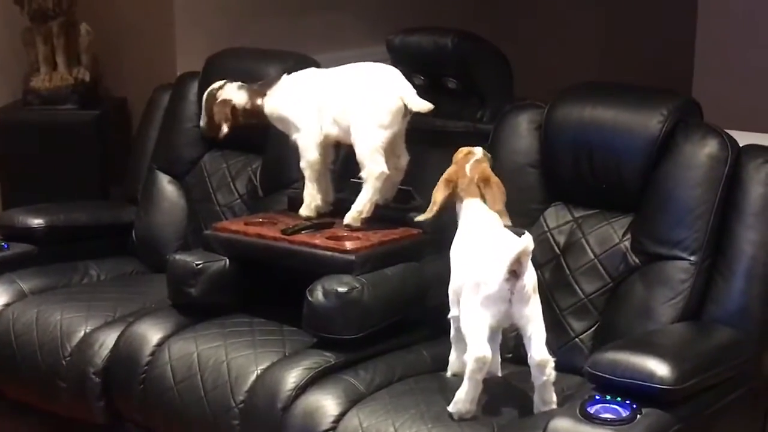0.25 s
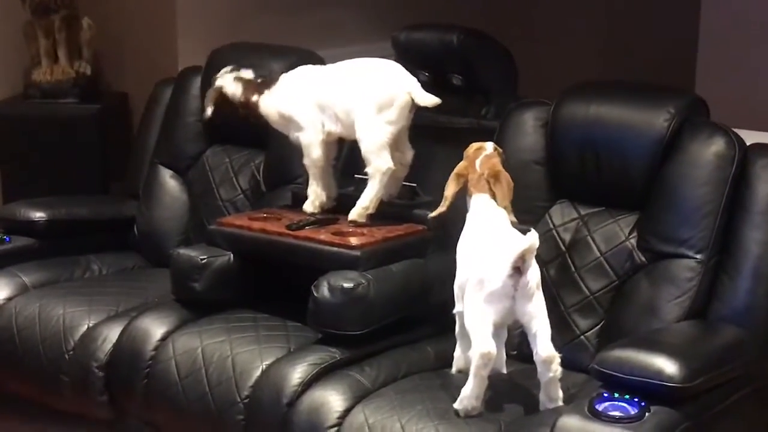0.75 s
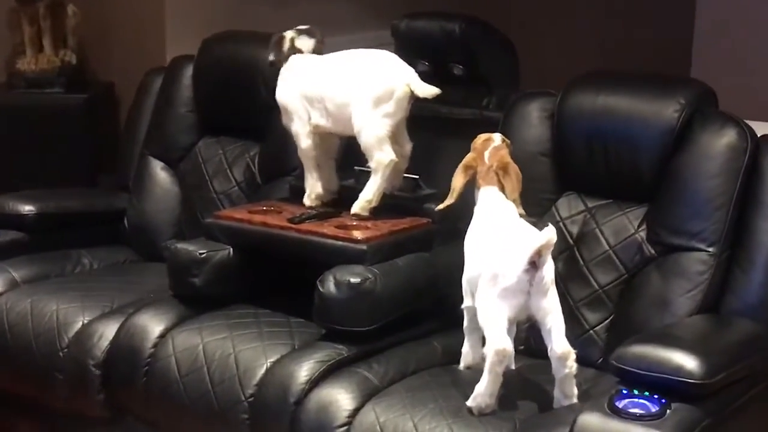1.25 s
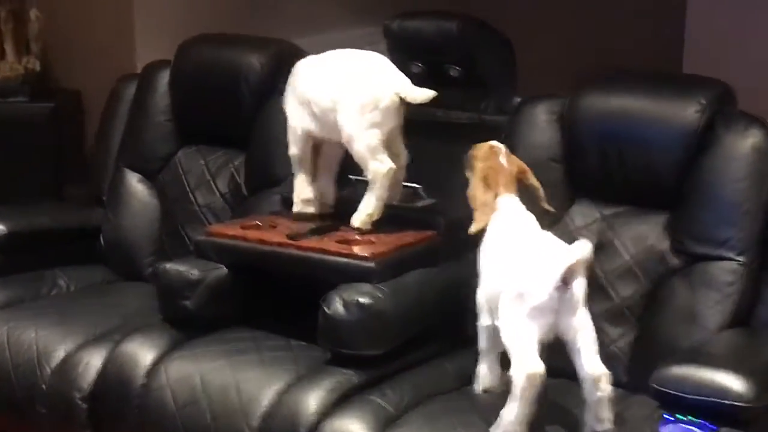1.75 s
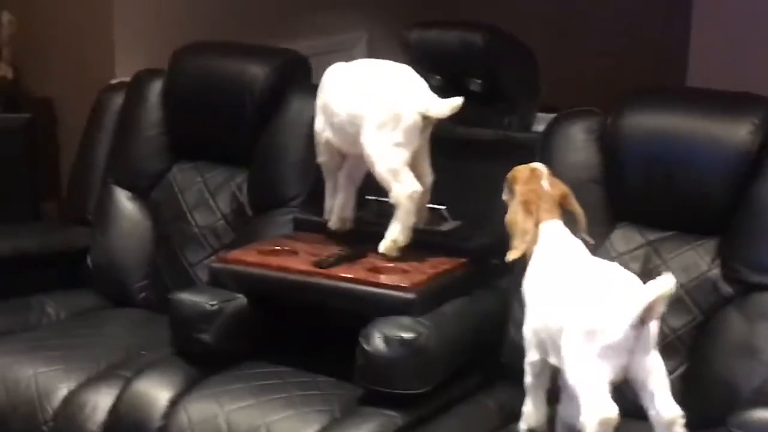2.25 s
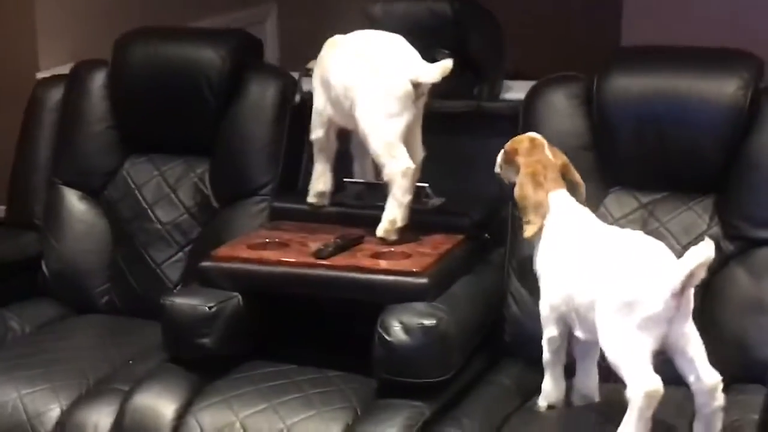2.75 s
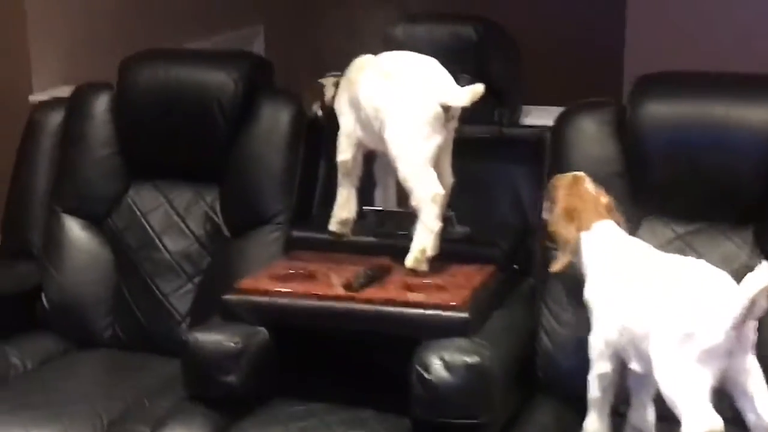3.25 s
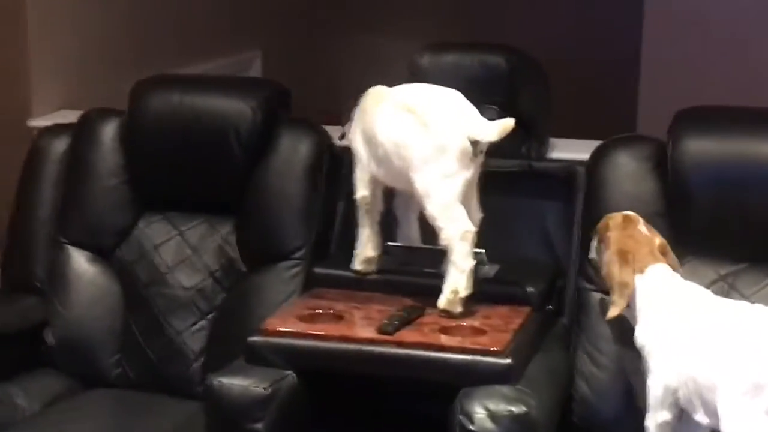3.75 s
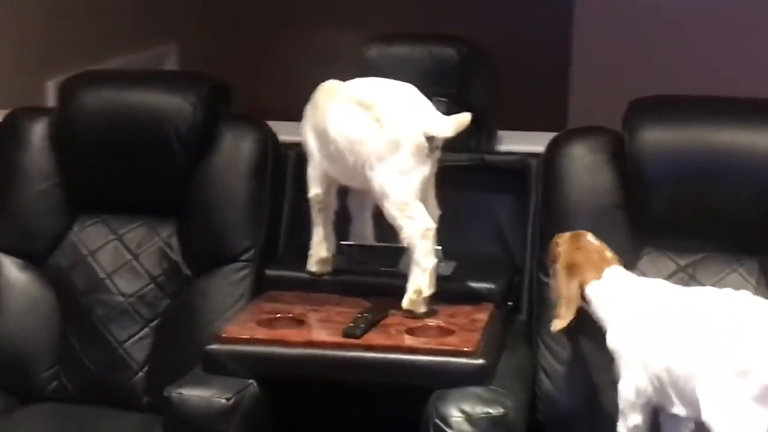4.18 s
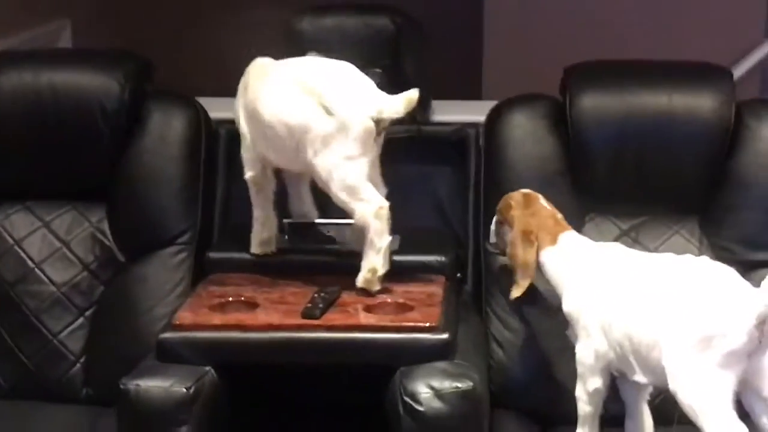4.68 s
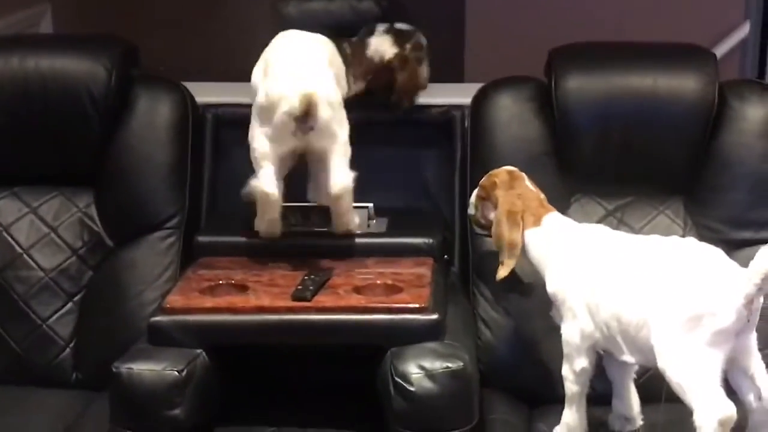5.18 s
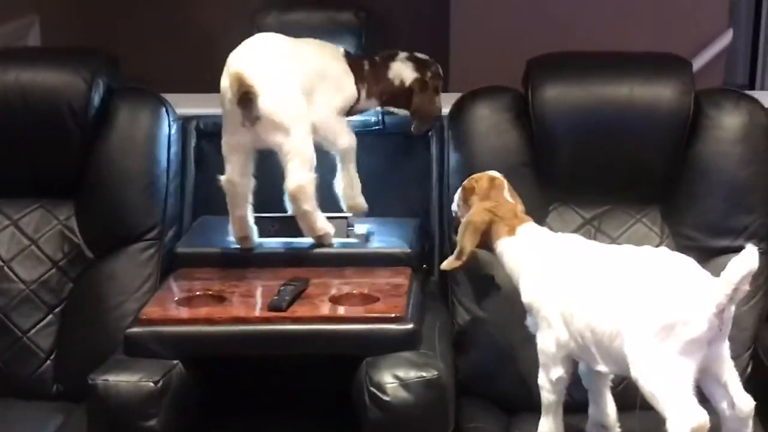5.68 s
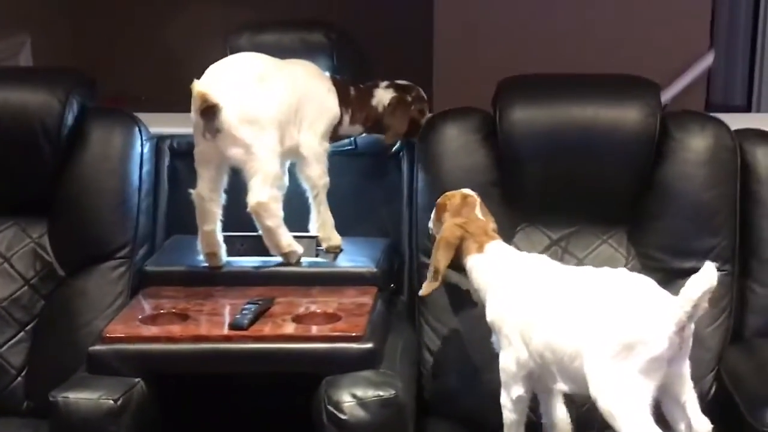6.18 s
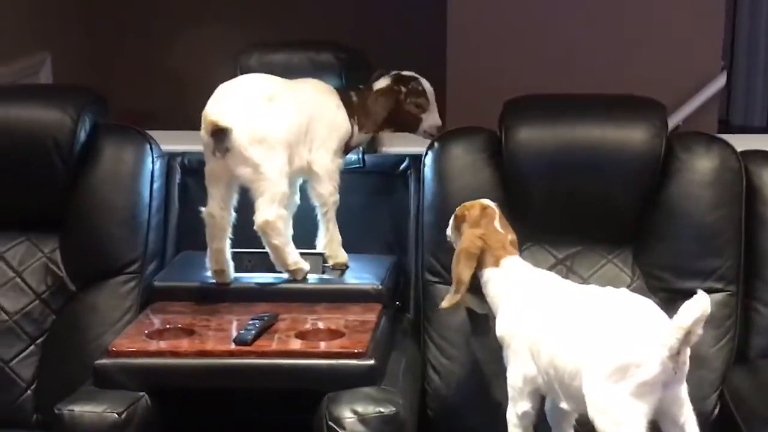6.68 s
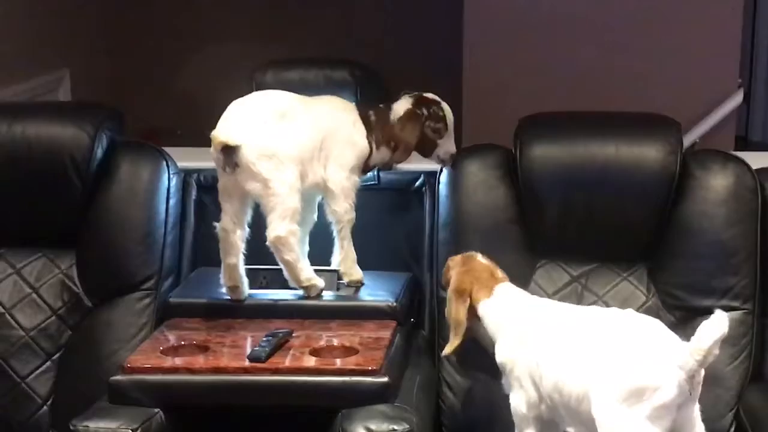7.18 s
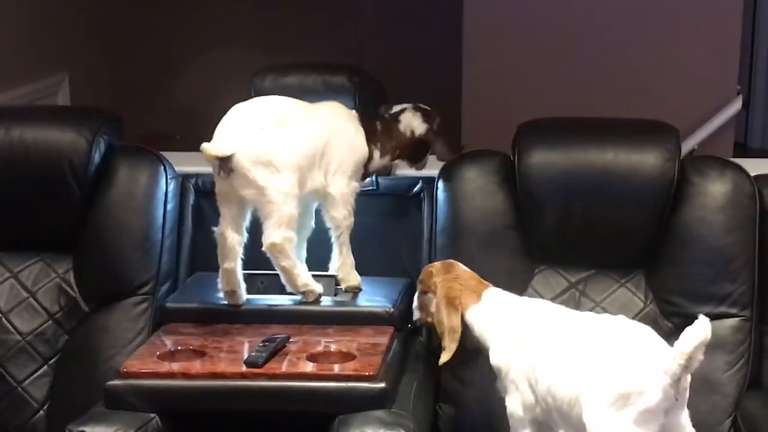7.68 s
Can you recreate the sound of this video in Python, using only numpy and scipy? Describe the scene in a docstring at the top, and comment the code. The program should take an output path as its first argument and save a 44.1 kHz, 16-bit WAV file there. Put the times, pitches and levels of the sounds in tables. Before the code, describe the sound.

Irregular soft thuds of a young goat's hooves come through leather seating, mixed with weight shifts, woody clicks and faint scuffing. The steps grow busier and heavier around the middle, then a single long trembling bleat starts abruptly, bright and reverberant, and drops off quickly. Afterwards the movement thins to light knocks and a short stuttering hoof drag. Quiet air and leather rustle lie beneath, heard through a modest mono microphone.

```python
"""A young goat, facing away, gives one long quavering bleat in a furnished room: harmonics through a throat
spectrum, heard more by the room's reflections than directly. Hooves and shifting weight send dry thuds
and a lumpy rumble through leather seats, made of falling sweeps, slow swings and filtered noise.
Hard edges tick as sets of ringing modes, a seam creaks and hooves scuff; air and leather hiss behind.
The microphone colours it all, with peaks in the treble."""
import sys
import numpy as np
from scipy import signal
from scipy.fft import rfft, irfft
from scipy.io import wavfile
from scipy.ndimage import uniform_filter1d

SR = 44100
rng = np.random.default_rng(int(sys.argv[2]) if len(sys.argv) > 2 else 0)


def dump_mix(stems):
    """Bounce the given channels to the path in sys.argv[1] as a 16-bit WAV at rate SR."""
    frames = np.atleast_2d(stems).T  # one column per channel
    limited = np.clip(frames, -1, 1)  # hard clip at full scale
    pcm = np.round(limited * 32767).astype(np.int16)
    wavfile.write(sys.argv[1], SR, pcm)


def magnitude_from_level(level_db):
    """Linear magnitude for a level in decibels (20 dB per decade)."""
    exponent = np.asarray(level_db, float) / 20
    return 10 ** exponent


N = 349713  # samples


def evened(x):
    """Scales to rms 1."""
    return x / np.sqrt(np.mean(x ** 2) + 1e-20)


def read(points, hz):
    """Reads a spectrum table on a log frequency axis."""
    f, value = np.transpose(points)
    return np.interp(np.log(hz + 1), np.log(f + 1), value)


def curve(rows):
    """Joins (time, value) rows by straight lines, at every sample."""
    s, value = np.transpose(rows)
    return np.interp(np.arange(N) / SR, s, value)


def add(mix, s, sound):
    """Mixes a sound in at time s."""
    part = mix[max(round(s * SR), 0):][:len(sound)]
    part += sound[:len(part)]


def coloured(x, colour):
    """Filters x by a spectrum table."""
    hz = np.fft.rfftfreq(len(x), 1 / SR)
    return irfft(rfft(x) * magnitude_from_level(read(colour, hz)), len(x))


# how long the furnished room rings: pitch_hz, t60_s
ROOM_DECAY = [(400, 0.21), (1500, 0.58), (4000, 0.34), (9000, 0.55)]


def room(x):
    """Sparse reflections of random sign, each band dying at its own speed."""
    taps = np.zeros(SR)
    at = np.arange(200, SR - 20, 20)
    taps[at + rng.integers(0, 20, len(at))] = rng.choice([-1., 1.], len(at))
    hz, t, z = signal.stft(taps, SR, nperseg=256)
    decay = magnitude_from_level(-60 * t / read(ROOM_DECAY, hz)[:, None])
    tail = signal.istft(z * decay, SR, nperseg=256)[1]
    return signal.fftconvolve(x, tail / np.linalg.norm(tail))[:N]


# the call as it goes: time_s, effort_db, pitch_hz (between quavers),
# treble_lift_db (as the mouth opens), mouth_hz (lowest mouth resonance)
BLEAT_COURSE = [(4.888, -39.5, 440.5, -1.5, 846), (4.94, -37, 447.7, 2.5, 1190),
                (5.048, -36.5, 440.5, 9.5, 1060), (5.3, -41.5, 440.1, 8, 1310),
                (5.449, -40.5, 435.2, 2.5, 1100), (5.602, -44, 430.5, 1, 940),
                (5.762, -42.5, 424.6, -7, 900), (5.871, -45, 419.4, -2, 930), (5.919, -43, 442, 0.5, 1110),
                (6.02, -46, 433.6, 5, 1090), (6.059, -42, 440.3, -1, 1017)]
# how the throat passes the voice: pitch_hz, level_db
THROAT_SPECTRUM = [(300, -13), (450, -12.5), (640, -56), (880, -6.5), (1350, -10.5), (1800, -9.5),
                   (2400, -7.5), (3100, -17), (4000, -14), (6000, -20), (8000, -41), (10500, -63)]


def bleat():
    """Harmonics of the vocal folds, flipping up in pitch at every quaver and shaped by throat and mouth."""
    attack_s, attack_db = 0.021, -22  # the voice snaps on
    release_db_per_s, release_hz_per_s = 316, 1100  # at the end it fades and slides down
    s, *columns = np.transpose(BLEAT_COURSE)
    t = np.arange(s[0] - attack_s, s[-1] + 0.063, 1 / SR)
    effort_db, hz, lift_db, mouth_hz = (np.interp(t, s, c) for c in columns)
    early = np.maximum(s[0] - t, 0) / attack_s
    late = np.maximum(t - s[-1], 0)
    effort_db = effort_db + attack_db * early - release_db_per_s * late
    hz = hz * (1 - 0.025 * early) - release_hz_per_s * late

    # the larynx flips to a higher register and back at a steady pace
    first_quaver_s, quaver_gap_s, half_length_s = 4.945, 0.0838, 0.021
    quaver_hz, quaver_db = 32.83, -5.5
    middle_s = first_quaver_s + quaver_gap_s * np.arange(14)[:, None]
    jumps = np.exp(-((t - middle_s) / half_length_s) ** 6).sum(axis=0)

    wobble, air = rng.standard_normal((2, len(t)))
    # the folds lose their hold as the breath runs out
    loose = 0.006 + 0.037 * np.clip((t - 6.04) / 0.033, 0, 1)
    hz = (hz + quaver_hz * jumps) * (1 + loose * evened(uniform_filter1d(wobble, size=600)))
    turns = np.cumsum(hz) / SR
    # unsteady folds, partly shared by all partials
    flutter = uniform_filter1d(rng.standard_normal((24, len(t))), size=800, axis=1)
    flutter_db = 3.6 * evened(flutter + flutter[0])

    bright_hz = 2972 + 300 * (t - s[0])  # a bright resonance climbs through the call
    tone = np.zeros(len(t))
    for k in range(1, 24):
        f = k * hz
        opening_db = lift_db * np.clip(np.log2(f / 1500), 0, 1)  # an open mouth raises the treble
        bright_db = 17 / (1 + ((f - bright_hz) / 200) ** 2)
        mouth_db = 14 / (1 + ((f - mouth_hz) / 387) ** 2)
        partial_db = read(THROAT_SPECTRUM, f) + opening_db + bright_db + mouth_db + flutter_db[k]
        tone += magnitude_from_level(partial_db) * np.cos(2 * np.pi * k * turns)

    # breath noise, strongest at the start of every cycle
    puffs = evened(coloured(np.exp(-(turns % 1) / 0.59) * air, THROAT_SPECTRUM)) * magnitude_from_level(0.17 * lift_db)
    voice = np.zeros(N)
    add(voice, t[0], (tone + 0.03 * puffs) * magnitude_from_level(effort_db + quaver_db * jumps))
    # a closed-mouth hum leads into the call
    hum_s = 0.045
    lead = np.arange(0, 2 * hum_s, 1 / SR)
    add(voice, t[0] - hum_s, magnitude_from_level(-51) * np.hanning(len(lead)) * np.sin(2 * np.pi * hz[0] * lead))
    return magnitude_from_level(-6) * voice + magnitude_from_level(-2.5) * room(voice)  # facing away: more room than direct voice


def thud(hz, low_db, grit):
    """Bending waves spread out: the high part arrives first and sweeps down, then a slow low swing."""
    t = np.arange(len(grit)) / SR
    f = np.fft.rfftfreq(len(grit), 1 / SR) / hz
    sweep = 2 * np.pi * np.cumsum(hz * (0.645 + 1.79 * np.exp(-t / 0.0045))) / SR
    # uneven contact
    rattle = evened(irfft(rfft(grit) * f / (1 + (f / 2.5) ** 5), len(grit)))
    rattle = 0.55 * magnitude_from_level(-60 * t / 0.04) * rattle
    blow = (np.sin(sweep) + rattle) * (1 - np.exp(-(t / 0.0034) ** 2))
    blow = blow * magnitude_from_level(11 - 60 * t * hz ** 0.5 / 0.91)  # higher thuds die sooner
    swing = np.sin(2 * np.pi * 62 * t) * (1 - np.exp(-t / 0.024))
    swing = swing * magnitude_from_level(low_db + 19 - 60 * t / 0.086)
    return blow - swing


# hoof blows on the seats: start_s, level_db, pitch_hz (scales the falling sweep),
# low_db (weight of the slow swing in the thud)
HOOF_THUDS = [(0.435, -38, 220, -17), (0.45, -40, 243, 11.5), (0.611, -46, 208, -13), (0.66, -32, 259, -36),
              (0.98, -26, 214, -1.5), (1.169, -26.5, 168, -2.5), (1.31, -37, 190, -19),
              (1.529, -38.5, 183, 1.5), (1.638, -43, 324, -20), (1.822, -29.5, 190, -6),
              (1.843, -35, 154, 4), (1.967, -28, 317, 3), (2.391, -37, 238, -11), (2.636, -35, 230, -1.5),
              (2.749, -34.5, 276, -3), (2.981, -37, 194, 2), (3.016, -29.5, 163, 2.5),
              (3.047, -31.5, 183, -7), (3.07, -28.5, 339, 3.5), (3.245, -33, 531, -32),
              (3.387, -14.5, 306.5, -21), (3.401, -23.5, 220.5, -5.5), (3.423, -28.5, 219, -1),
              (3.767, -25, 189, -3), (3.827, -26, 192, -26), (3.873, -27, 223, -5.5),
              (3.939, -42, 206, -17), (3.961, -33.5, 160, -24), (4.031, -20, 206, -3),
              (4.064, -27, 227, -8), (4.095, -33, 207, 1), (4.475, -26.5, 216, -4.5),
              (4.627, -26, 221, -5.5), (4.668, -26.5, 195, -3.5), (4.772, -43.5, 290, -13),
              (4.796, -30.5, 218, -6), (5.119, -40.5, 157, -3), (5.468, -25.5, 203, -1.5),
              (5.791, -39.5, 290, -2), (5.812, -31, 166, -10), (6.224, -40.5, 249.1, 2),
              (6.252, -35, 174, 0), (6.289, -38.5, 175, 4.5), (6.599, -33.5, 370, 4),
              (6.632, -33.5, 252, -13), (6.82, -31.5, 263, -18), (6.775, -47, 236, -0.5),
              (6.889, -44, 170, -1), (7.106, -55.5, 161, -3), (7.174, -49.5, 167, -6),
              (7.281, -52, 155, 3.5), (7.462, -51, 248, 7), (7.501, -31.5, 255, 1.5)]


def thuds():
    """Hoof blows carried through the furniture, each a bending-wave thud with its own grit."""
    out = np.zeros(N)
    for s, db, hz, low_db in HOOF_THUDS:
        add(out, s - 0.0015, magnitude_from_level(db) * thud(hz, low_db, rng.standard_normal(6000)))
    return out


# one hoof dragged over leather: start_s, end_s, jerks_per_s, pitch_hz, level_db
HOOF_JUDDER = (7.522, 7.65, 64, 205, -47)


def judder():
    """Stick-slip: the hoof grips and lets go in a quick row of slightly uneven small thuds."""
    out = np.zeros(N)
    start, end, rate, hz, db = HOOF_JUDDER
    for k in range(int(np.ceil((end - start) * rate))):
        late, size = rng.standard_normal(2)
        jerk = thud(hz, -6.5, rng.standard_normal(3000))
        add(out, start + (k + 0.057 * late) / rate, magnitude_from_level(db + 2 * size) * jerk)
    return out


# weight shifting on the seats: time_s, rumble_db
WEIGHT_SHIFT = [(0, -60.5), (.15, -48), (.3, -58.5), (.9, -45), (1.4, -44), (2.25, -50.5), (2.65, -44),
                (2.88, -51), (3.1, -36), (3.55, -52), (3.75, -54), (4, -39), (4.25, -49), (5.3, -53.5),
                (6.05, -44.5), (6.18, -55), (6.35, -46.5), (7.0, -64), (7.58, -54), (7.93, -56)]


def shifting():
    """Weight moving on the seats: low filtered noise and a dense run of small random bumps."""
    rumble_colour = [(15, -62.5), (40, -0.5), (62, -5.5), (110, -5), (200, -15), (400, -79)]  # (Hz, dB)
    low = evened(coloured(rng.standard_normal(N), rumble_colour))
    size = magnitude_from_level(4.47 * np.minimum(rng.exponential(1, N), 4)) * rng.choice([-1, 1], N)
    size = size * (rng.random(N) < 220 / SR)  # about 220 bumps per s
    kind = rng.integers(0, 6, N)
    bumps = np.zeros(N)
    for k, hz in enumerate(np.geomspace(120, 330, 6)):
        bump = thud(hz, -24, rng.standard_normal(3000))
        bumps += signal.oaconvolve(size * (kind == k), bump)[:N]
    rumble_db = curve(WEIGHT_SHIFT)
    return magnitude_from_level(rumble_db) * low + magnitude_from_level(rumble_db - 4) * evened(bumps)


def ring(modes, chance):
    """One blow on a set of modes; the place of the blow shades and detunes each one; peak 1."""
    t = np.arange(2500) / SR
    out = np.zeros(len(t))
    for (hz, db, t60), shade, detune in zip(modes, chance, chance[10:]):
        level = magnitude_from_level(db + 3.5 * shade - 60 * t / t60)
        out += level * np.sin(2 * np.pi * hz * (1 + 0.03 * detune) * t + detune)
    out = out * (1 - np.exp(-t / 0.00013))
    return out / abs(out).max()


# woody body of a hard contact: pitch_hz, level_db, t60_s
WOOD_MODES = [(545, -2, .024), (850, 0, .024), (1020, -2, .022), (1300, -8, .018), (1680, -8, .016)]
# crack of a hard edge: pitch_hz, level_db, t60_s
EDGE_MODES = [(2030, -4, 0.0085), (2350, -2.5, 0.021), (2880, 0, 0.012), (3230, -9.5, 0.018),
              (3790, -7.5, 0.017), (4400, -5, .011)]
# hard contacts: start_s, level_db (peak of the crack), body_db (relative), top_db (spark, relative)
HARD_TICKS = [(0.244, -46, -17, -32), (0.4501, -38, 18, -28), (0.522, -37.5, -7, -39),
              (0.643, -38, -2, -31), (0.656, -38, 1, -26), (0.68, -32, -3.5, -34), (1.1697, -33.5, 15, -39),
              (1.535, -61.5, 23, -11), (1.842, -38, 12, -25), (1.989, -40.5, 3.5, -28),
              (2.189, -41.5, -32, -26), (2.9817, -41.5, 3.5, -24), (2.987, -38.5, 1, -24),
              (3.027, -44.5, 11, -23), (3.0751, -22, 11.5, -23), (3.08, -27, -12.5, -30),
              (3.115, -52.5, -8, 2.5), (3.138, -46, -4, -7), (3.212, -38, -2.5, -14),
              (3.226, -47, 14.5, -20), (3.236, -45, 5.5, -19), (3.247, -27, 8, -12.5),
              (3.3823, -75, -12, -23), (3.426, -63, 21, -19), (3.566, -45, 12, -22), (4.475, -60, 32, -25),
              (6.5995, -42, 21, -26), (6.675, -37.5, -21, -24), (6.822, -36.5, -6.5, -31),
              (6.844, -37.5, -10, -27), (7.163, -59, 15, -20)]


def ticks():
    """Hard, short contacts: a ringing woody body, a ringing crack and a spark of treble noise."""
    out, t = np.zeros(N), np.arange(900) / SR
    treble = signal.butter(2, (4600, 9500), "bandpass", fs=SR, output="sos")
    for s, db, body_db, top_db in HARD_TICKS:
        grit = rng.standard_normal(900)
        spark = evened(signal.sosfilt(treble, grit * magnitude_from_level(-60 * t / 0.0051))) / 6
        add(out, s, magnitude_from_level(db) * ring(EDGE_MODES, grit))
        add(out, s, magnitude_from_level(db + body_db) * ring(WOOD_MODES, grit[20:]))
        add(out, s, magnitude_from_level(db + top_db) * spark)
    return out


# one seam creaking faintly: start_s, end_s, slips_per_s, level_db
SEAM_CREAK = (6.86, 7.155, 59, -62)


def creak():
    """A seam slips at a nearly steady rate, each slip a clipped-short ring of a few modes."""
    out = np.zeros(N)
    start, end, rate, db = SEAM_CREAK
    for k in range(int(np.ceil((end - start) * rate))):
        chance = rng.standard_normal(40)
        slip = (ring(WOOD_MODES[3:], chance) + ring(EDGE_MODES[:2], chance))[:150]
        add(out, start + (k + 0.073 * chance[-1]) / rate, magnitude_from_level(db + 2 * chance[-2]) * slip)
    return out


# hooves sliding on leather: start_s, length_s, level_db
HOOF_SCUFFS = [(0.642, 0.035, -57), (1.646, 0.13, -62.5), (1.806, 0.063, -56), (2.571, 0.08, -51),
               (2.973, 0.12, -55), (3.536, 0.049, -60.5), (4.085, 0.076, -60.5), (6.817, 0.03, -56),
               (7.153, 0.025, -60)]
# colour of leather noise, in the scuffs and the rustling: pitch_hz, level_db
LEATHER_COLOUR = [(250, -34), (500, 5.5), (800, -4.5), (1400, 2), (3000, 3), (6000, -10), (8000, -23),
                  (10000, -27.5)]


def scuffs():
    """Sliding hooves: noise of quickly varying strength in the leather's colour, in short swells."""
    out = np.zeros(N)
    unevenness = evened(uniform_filter1d(rng.standard_normal(N), size=70))
    grit = rng.standard_normal(N) * magnitude_from_level(4.5 * unevenness)
    grit = evened(coloured(grit, LEATHER_COLOUR))
    for s, length, db in HOOF_SCUFFS:
        swell = signal.windows.tukey(round(length * SR), 0.4)
        add(out, s, magnitude_from_level(db) * swell * grit[round(s * SR):][:len(swell)])
    return out


def contacts():
    """Ticks, creak and scuffs, mostly direct, with a little of the room."""
    out = ticks() + creak() + scuffs()
    return out + magnitude_from_level(-20.5) * room(out)


def noise(colour, patchy_db):
    """Coloured noise of rms 1 whose level drifts in patches of time and pitch."""
    frames, hz = N // 128 + 5, np.fft.rfftfreq(512, 1 / SR)
    a, b, patches = rng.standard_normal((3, 257, frames))
    patches = uniform_filter1d(patches, size=8, axis=0)
    patches = evened(uniform_filter1d(patches, size=10, axis=1))
    z = (a + 1j * b) * magnitude_from_level(read(colour, hz)[:, None] + patchy_db * patches)
    return evened(signal.istft(z, nperseg=512, noverlap=384)[1][:N])


# leather rustling: time_s, level_db
LEATHER_RUSTLE = [(0, -69), (1.1, -66), (3.3, -60.5), (3.9, -67), (4.8, -62), (6.6, -62), (7.1, -62.5),
                  (7.6, -63), (7.93, -69)]


def rustle():
    """Leather rubbing on itself: patchy noise in the leather's colour, swelling and sinking."""
    return magnitude_from_level(curve(LEATHER_RUSTLE)) * noise(LEATHER_COLOUR, patchy_db=0.8)


# colour of the room air: pitch_hz, level_db
AIR_COLOUR = [(150, -41), (300, 8), (600, -35.5), (1200, -9.5), (3000, -23.5), (7000, -35.5), (9000, -24),
              (16000, -26.5)]


def room_air():
    """Steady, slightly patchy noise of the air in the room."""
    return magnitude_from_level(-69) * noise(AIR_COLOUR, patchy_db=0.8)


# a flat hiss that switches on and off: start_s, end_s, level_db
HISS_SPELL = (4.034, 4.441, -65)


def flat_hiss():
    """Nearly white noise, switched on and off without a fade."""
    t = np.arange(N) / SR
    start, end, db = HISS_SPELL
    flat = evened(coloured(rng.standard_normal(N), [(2000, -13), (16000, -14)]))
    return magnitude_from_level(db) * flat * (t > start) * (t < end)


def scene():
    """All sources, one channel."""
    goat = bleat() + thuds() + judder() + shifting()
    return (goat + contacts() + rustle() + room_air() + flat_hiss())[None]


def top_cut(x):
    """Nothing passes above the cut-off."""
    return signal.sosfilt(signal.butter(12, 16370, fs=SR, output="sos"), x)


# microphone, its housing and the band limit: pitch_hz, level_db
MICROPHONE = [(2000, -1), (2700, -3), (3350, 4.5), (4000, -2), (4850, -5), (5400, 2.5), (6200, 4.5),
              (6750, 0), (7350, 8), (8200, 0.5), (10500, -7), (12000, -1), (15700, -3), (15850, -46.5)]


def record(dry):
    """The microphone and its housing colour everything, with resonant peaks in the treble."""
    mix = coloured(dry[0], MICROPHONE)[None]
    return top_cut(mix)


dry = scene()
out = record(dry)
dump_mix(out)
```